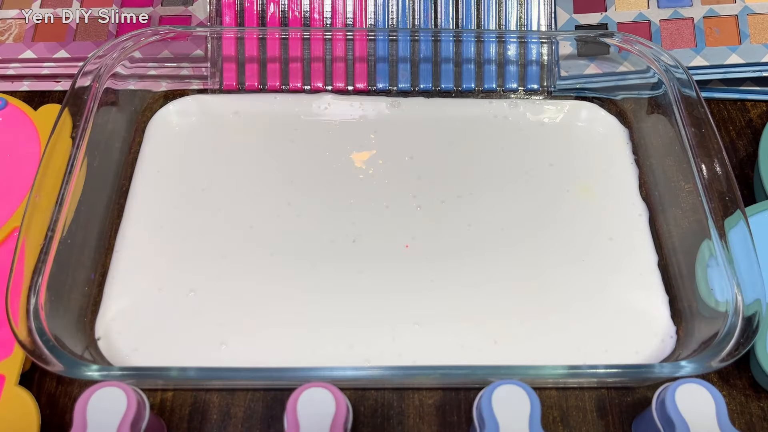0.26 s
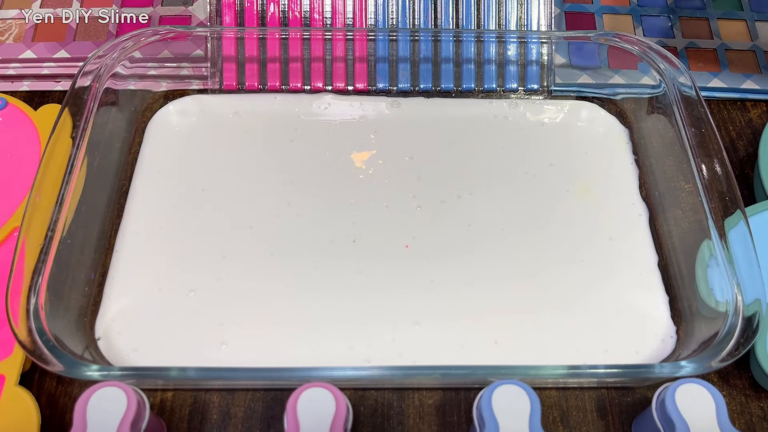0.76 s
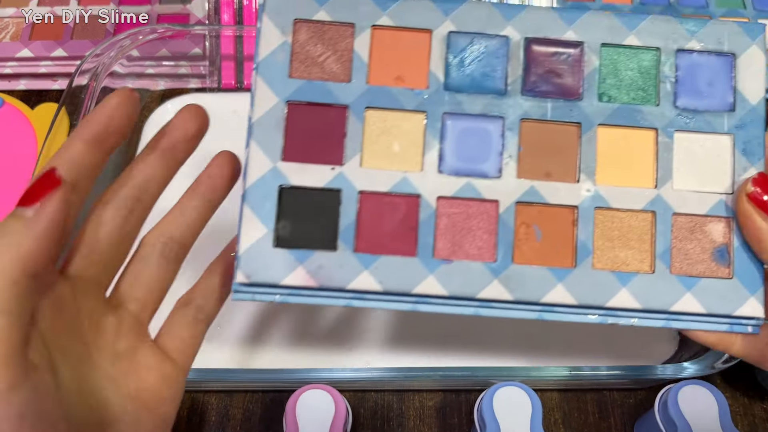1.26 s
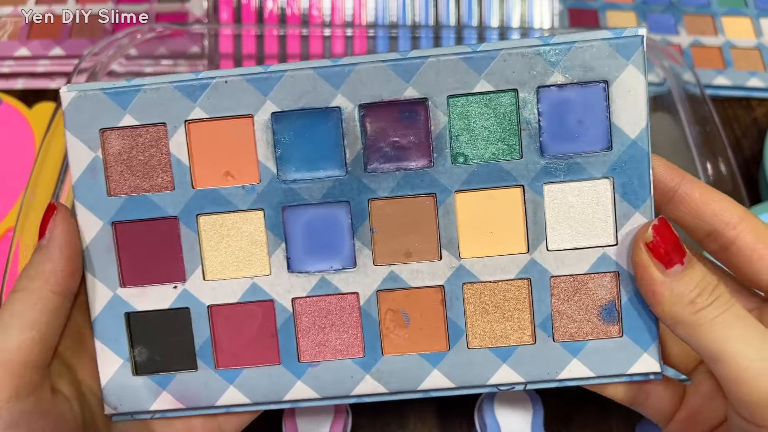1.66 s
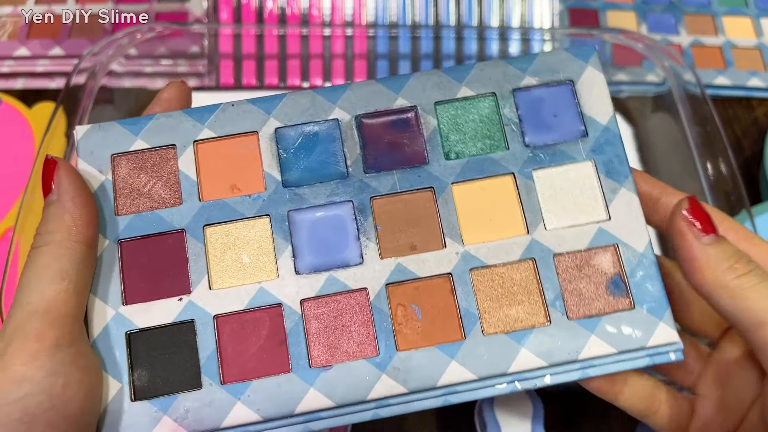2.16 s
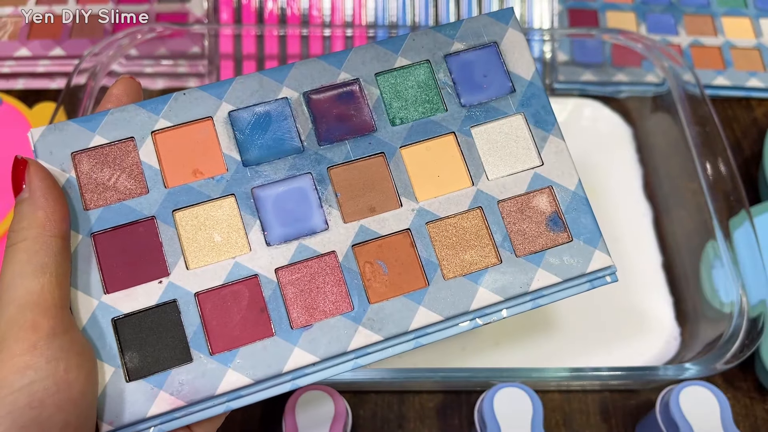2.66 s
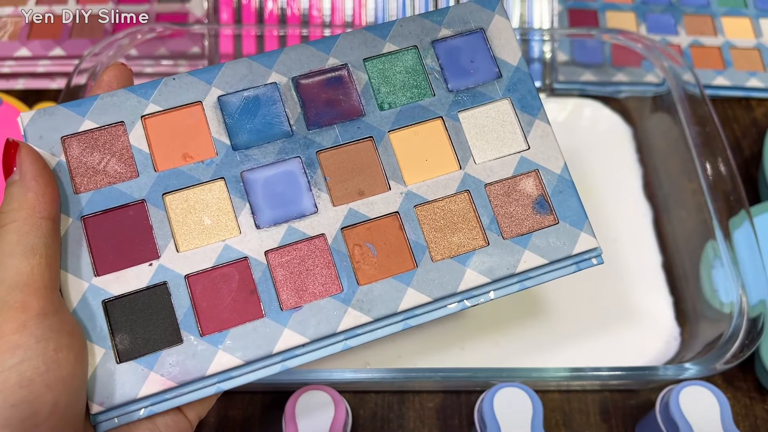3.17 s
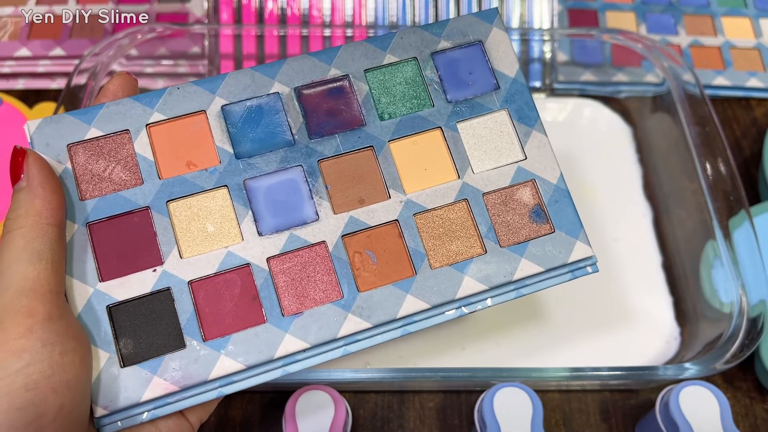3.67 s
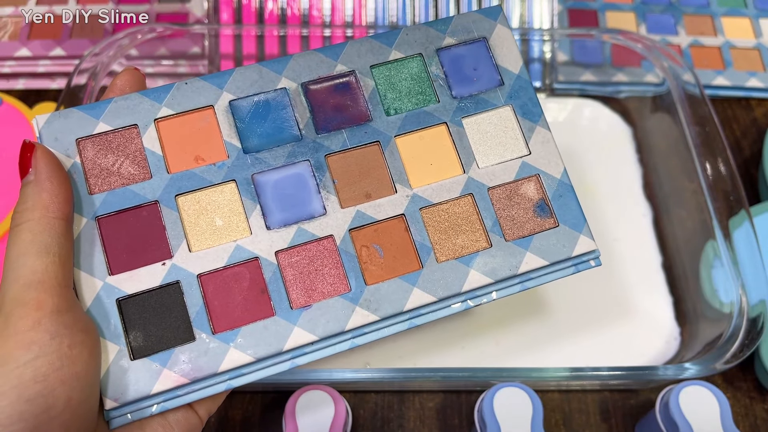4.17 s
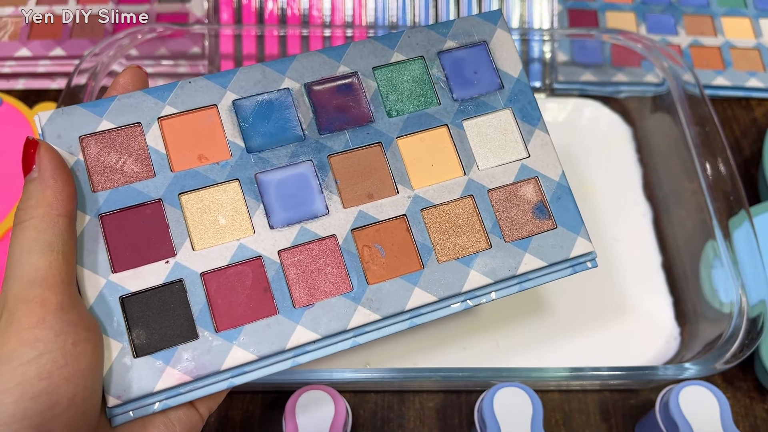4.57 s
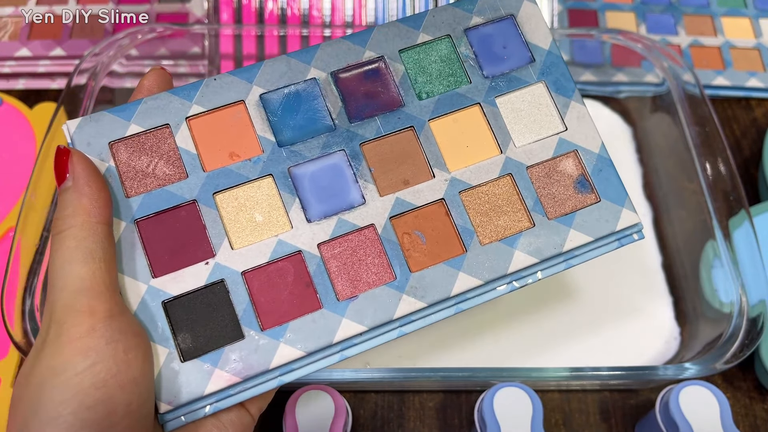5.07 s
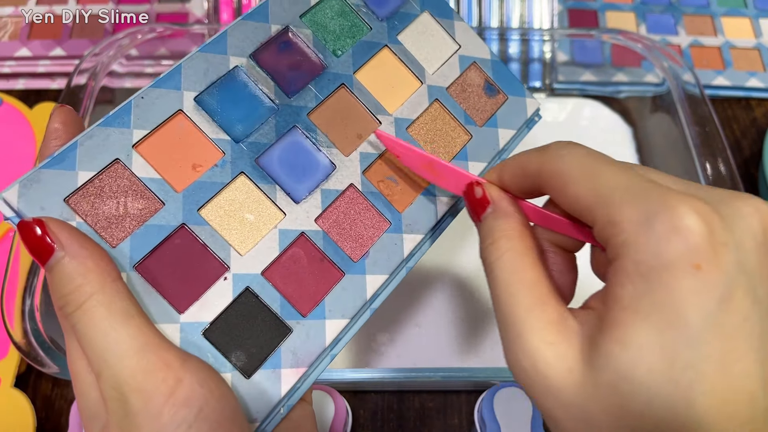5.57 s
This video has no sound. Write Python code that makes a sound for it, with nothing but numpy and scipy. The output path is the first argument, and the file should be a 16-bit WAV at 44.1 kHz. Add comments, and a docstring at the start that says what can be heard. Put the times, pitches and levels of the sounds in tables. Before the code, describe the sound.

A cardboard palette knocks sharply on a table, a quiet gap follows, then clacks, scuffing slides and small plastic tool clicks over faint hiss.

```python
"""A cardboard eyeshadow palette is knocked on a table and lifted over a glass dish: damped bending waves,
edge echoes, a thud and rebounds. Hard clicks are a tap on the dish, then plastic tools as a hand picks a
spatula; fingers slide and hard edges scrape as swells of uneven filtered noise; bumped things ring as
dying modes. A small dry room adds short reflections, hiss, a faint wavering hum and low hollow background
noise around 500 Hz that steps up twice. Two close microphone ports differ in delay and colour."""
import sys
import numpy as np
from scipy import signal
from scipy.fft import rfft, irfft
from scipy.io import wavfile
from scipy.ndimage import uniform_filter1d

SR = 44100
rng = np.random.default_rng(int(sys.argv[2]) if len(sys.argv) > 2 else 0)


def digitize_waveform(pressure):
    """Quantize a signal to 16-bit integers and store it at the path in sys.argv[1].

    Rows of a 2-D input are taken as channels; values are limited to [-1, 1].
    """
    field = np.atleast_2d(pressure).T
    bounded = np.clip(field, -1, 1)
    quanta = np.round(bounded * 32767).astype(np.int16)
    wavfile.write(sys.argv[1], SR, quanta)


N = 257103  # samples


def gain_of(db):
    """Decibels to amplitude."""
    return 10 ** (np.asarray(db) / 20)


def evened(x):
    """Scales to rms 1."""
    return x / np.sqrt(np.mean(x ** 2) + 1e-20)


def burst(x, db):
    """Scales a short sound to the energy of 10 ms at this level."""
    energy = np.sum(x ** 2, -1, keepdims=True) + 1e-20
    return gain_of(db) * x * np.sqrt(SR / 100 / energy)


def read(points, hz):
    """Interpolates a spectrum table linearly over log frequency."""
    f, value = np.transpose(points)
    return np.interp(np.log(hz + 1), np.log(f + 1), value)


def coloured(x, points):
    """Causal minimum-phase filter with the given spectrum."""
    size = 4096
    log_gain = np.log(gain_of(read(points, abs(np.fft.fftfreq(size, 1 / SR)))))
    min_phase = np.exp(np.conj(signal.hilbert(log_gain)))
    taps = np.fft.ifft(min_phase).real[:size // 2]
    return signal.fftconvolve(x, taps[None], axes=1)[:, :x.shape[1]]


def add(mix, start_s, sound):
    """Mixes a sound in at start_s."""
    part = mix[:, max(round(start_s * SR), 0):][:, :sound.shape[-1]]
    part += sound[..., :part.shape[1]]


def pair(size, same):
    """White noise at two ports that share a part of its power."""
    same = np.clip(same, 0, 1)
    common = np.sqrt(same) * rng.standard_normal(size)
    return common + np.sqrt(1 - same) * rng.standard_normal((2, size))


def ports(x, lag_samples):
    """Direction: the left port hears the sound lag_samples later."""
    i = np.arange(x.shape[1])
    left = np.interp(i - np.round(lag_samples), i, x[0], left=0)
    return np.array([left, x[1]])


def drift(rate_hz):
    """Smooth random wandering of rms 1, low-passed near rate_hz."""
    lowpass = np.exp(-(np.fft.rfftfreq(N, 1 / SR) / rate_hz) ** 2)
    return evened(irfft(rfft(rng.standard_normal(N)) * lowpass, N))


# even hiss: f/Hz, density/dB per Hz
HISS = [(40, 2.5), (1000, 1), (2000, -2.5), (5000, -7), (9600, -5), (11300, -3), (12600, -12.5)]
# ridge of hiss, left port only: f/Hz, density/dB per Hz
RIDGE = [(1000, -19), (5050, -25.5), (5450, -12), (6100, -0.5), (6800, -10.5), (7350, -24.5), (8100, -25.5),
         (8600, -15.5), (9300, -38.5)]


def hiss(hiss_db=-78.5, ridge_db=-67):
    """Steady filtered noise, with a narrow band near 6 kHz on the left."""
    out = gain_of(hiss_db) * evened(coloured(pair(N, 0.15), HISS))
    out[0] += gain_of(ridge_db) * evened(coloured(rng.standard_normal((1, N)), RIDGE))[0]
    return out


# steady low background noise: f/Hz, density/dB per Hz
LOW_NOISE = [(20, -17), (55, -5.5), (170, -14.5), (250, -7), (370, -8), (430, -12), (485, 0.5), (530, 1.5),
             (575, -3.5), (625, -0.5), (720, -10.5), (850, -16.5), (1100, -33), (2500, -50.5)]
# background noise added while raised: f/Hz, density/dB per Hz
RAISED_NOISE = [(60, -13), (250, -10), (430, -8.5), (490, 2.5), (560, 3.5), (630, -3.5), (730, -13.5),
                (900, -22.5), (2500, -53.5)]
# noise steps up, holds, sinks back: start t/s, end t/s
RAISED_SPANS = [(0, 0.61), (2.348, 3.626)]


def low_noise(steady_db=-67, raised_db=-56.5, attack_s=0.011, release_s=0.055, flutter_db=1.4):
    """Low hollow background noise around 500 Hz that steps up twice, holds and sinks back; it flutters."""
    t = np.arange(N) / SR
    envelope = sum(np.interp(t, [on, on + attack_s, off, off + release_s], [0, 1, 1, 0])
                   for on, off in RAISED_SPANS)
    steady = gain_of(steady_db) * evened(coloured(pair(N, 0.5), LOW_NOISE))
    raised = gain_of(raised_db) * envelope * evened(coloured(pair(N, 0.52), RAISED_NOISE))
    return ports((steady + raised) * gain_of(flutter_db * drift(22)), 5)


# hum before its random wander: t/s, level/dB
HUM_LEVEL = [(0.0, -68.5), (1.23, -82), (2.14, -75), (3.04, -65.5), (3.41, -76), (4.98, -81), (5.52, -76.5),
             (5.83, -82.5)]


def hum(centre_hz=116, waver_hz=4.5, wander_db=3.4):
    """One sine whose pitch and level wander."""
    tone = np.sin(2 * np.pi * np.cumsum(centre_hz + waver_hz * drift(12)) / SR)
    level_db = np.interp(np.arange(N) / SR, *np.transpose(HUM_LEVEL))
    return gain_of(level_db + wander_db * drift(5.98)) * evened(tone)


def room_tone():
    """Hiss, low noise and hum together."""
    return hiss() + low_noise() + hum()


# room decay: f/Hz, t60/s
ROOM = [(100, 0.36), (260, .2), (700, 0.13), (1800, 0.168), (4800, 0.18), (11000, 0.15)]


def room(x, gap_s=0.0027, build_s=0.0034):
    """Dense reflections of random sign, each band dying at its own speed."""
    hz, t, z = signal.stft(pair(SR // 2, 0.48), SR, nperseg=256)
    decay = gain_of(-60 * t / read(ROOM, hz)[:, None])
    tail = signal.istft(z * decay, SR, nperseg=256)[1]
    after_gap_s = np.maximum(np.arange(tail.shape[1]) / SR - gap_s, 0)
    tail = tail * (1 - np.exp(-after_gap_s / build_s))
    return signal.fftconvolve(x, tail / np.linalg.norm(tail[0]), axes=1)[:, :N]


def ring(modes, t):
    """Sum of exponentially dying sine modes of a struck thing."""
    return sum(gain_of(db - 60 * t / t60) * np.sin(2 * np.pi * hz * t) for hz, db, t60 in modes)


# modes of table top, glass dish, loose tools, plastic spatula: f/Hz, relative level/dB, t60/s
TABLE = [(102, -10.5, 0.15), (172, 1.5, 0.15), (215, -9, 0.057)]
DISH = [(1410, 5, 0.12), (1760, -30, 0.13), (2690, -20.5, 0.11), (3300, 0, 0.098), (4070, -7, 0.057)]
TOOLS = [(1065, 1, 0.068), (1486, -23.5, 0.11), (1750, -12, 0.12), (2254, 2, 0.12), (3100, -11, 0.1188)]
SPATULA = [(3370, 2, 0.016), (3650, -13, 0.04), (4860, -15.5, 0.02)]
# bumps that leave something ringing: t/s, modes, level/dB, build-up/s
BUMPS = [(0.371, TABLE, -36, 0.0058), (0.619, DISH, -53.5, .0005), (4.1758, SPATULA, -39, .0006),
         (4.461, SPATULA, -45, 0.0016), (4.473, SPATULA, -48, .001), (4.505, TABLE, -50, .01),
         (4.508, TOOLS, -45, 0.0012)]


def ringing():
    """Table, dish, spatula and loose tools ring on in their modes when bumped."""
    out, t = np.zeros((2, N)), np.arange(SR // 3) / SR
    for start_s, modes, db, build_s in BUMPS:
        add(out, start_s, burst(ring(modes, t) * (1 - np.exp(-t / build_s)), db))
    return out


def contact_spot(x, ring_s=0.0034, ring_db=-5):
    """Each rubbed spot has its own crowd of short resonances."""
    t = np.arange(SR // 50) / SR
    taps = rng.standard_normal(len(t)) * np.exp(-t / ring_s)
    taps = (t == 0) + gain_of(ring_db) * taps / np.linalg.norm(taps)
    return signal.fftconvolve(x, taps[None] / np.linalg.norm(taps), axes=1)[:, :x.shape[1]]


# cardboard rasp and skin swish: f/Hz, density/dB per Hz
RASP = [(60, -19.5), (200, 0), (650, -8.5), (1050, -5), (1600, -7.5), (2300, -6), (4000, -39)]
SWISH = [(2500, -29), (5000, -13), (7000, -9.5), (9300, 2), (10300, -4.5), (11300, 2), (12000, -14),
         (13000, -14.5)]
SCRAPE_HZ = 3450  # pitch at which the scrape tables are written


def stroke(peak_s, length_s, rasp_db, scrape_db, scrape_colour, scrape_hz, swish_db,
           grain_db=4.0, grain_s=0.0009, rise_share=0.53, lag_samples=11):
    """Sliding contact: a pressure swell of tiny uneven slips, from dull rasp to swish."""
    t = np.arange(-SR // 5, SR // 5) / SR
    width_s = length_s * np.where(t < 0, rise_share, 1 - rise_share)
    pressure = np.exp(-0.5 * (t / width_s) ** 2)
    grain = uniform_filter1d(rng.standard_normal(len(t)), max(round(grain_s * SR), 1))
    slips = gain_of(grain_db * evened(grain))
    edge = np.array(scrape_colour) * [scrape_hz / SCRAPE_HZ, 1]  # a stiffer edge scrapes higher
    layers = (RASP, rasp_db), (edge, scrape_db), (SWISH, swish_db)
    friction = sum(gain_of(db) * evened(coloured(pair(len(t), 0.3) * slips, colour))
                   for colour, db in layers)
    return peak_s + t[0], ports(contact_spot(friction) * pressure, lag_samples)


# soft and hard-edge scrape, the latter with a narrower peak: f/Hz, density/dB per Hz
SCRAPE = [(1000, -29.5), (1700, -10), (2300, -4.5), (2850, -5.5), (3450, -4.5), (3950, -7.5), (5200, -9.5),
          (7000, -11), (11000, -26.5)]
EDGE_SCRAPE = [(1000, -17), (1700, -12.5), (2900, -6), (3250, -0.5), (3450, 3.5), (3680, -9), (4300, -9.5),
               (7000, -17.5), (11000, -33)]
# scuff under a knock: knock level/dB, scuff level/dB
SCUFF_LEVEL = [(-50, -49), (-21, -43.5)]
# finger and cardboard slides: peak t/s, length/s, base level/dB, brightness/dB (- rasp, + swish)
SLIDES = [(0.086, 0.038, -87, 9), (0.291, 0.045, -79.5, 8), (.315, 0.016, -56, -0.5),
          (0.584, 0.018, -75.5, -19), (.616, .023, -59.5, -13.5), (1.46, 0.024, -72, 0.5),
          (2.001, 0.055, -70.5, 20.5), (2.142, 0.018, -73, 2), (2.753, 0.03, -55, -4.5),
          (3.054, 0.036, -55, -1.5), (3.112, 0.054, -68.5, -7.5), (3.21, 0.019, -46.5, -4.5),
          (3.368, 0.028, -51, -4.5), (3.414, 0.015, -52, -2.5), (3.455, 0.036, -46.5, -0.5),
          (3.523, 0.05, -66, 0), (4.032, 0.074, -69, 6), (4.195, 0.039, -60.5, -1),
          (4.494, 0.016, -40.5, -3.5), (4.513, 0.019, -42.5, -2.5), (5.21, .03, -78.5, 4.5)]
# hard edges: peak t/s, length/s, base level/dB, f/Hz
SCRAPES = [(1.525, 0.011, -60.5, 3250), (3.321, 0.051, -55, 4050), (4.106, 0.066, -64, 3700),
           (4.274, 0.053, -70.5, 4700), (4.467, .025, -52.5, 4630)]
# layers, dB re the scuff, slide or scrape level
SCUFF_RASP_DB, SCUFF_SCRAPE_DB, SCUFF_SWISH_DB = -2, -9, -26.5
SLIDE_RASP_DB, SLIDE_SCRAPE_DB, SLIDE_SWISH_DB = -2, 1.5, -1
EDGE_RASP_DB, EDGE_SCRAPE_DB, EDGE_SWISH_DB = -5, 3.5, -8.5
SCUFF_S, SCUFF_LEAD_S, SLIDE_HZ = 0.015, 0.004, 3530


def rubbing():
    """Friction strokes: a scuff around each knock, soft slides, scrapes of hard edges."""
    out = np.zeros((2, N))
    for start_s, knock_db, *_, gap_s in KNOCKS:
        db = np.interp(knock_db, *np.transpose(SCUFF_LEVEL))
        add(out, *stroke(start_s + gap_s - SCUFF_LEAD_S, SCUFF_S, db + SCUFF_RASP_DB,
                         db + SCUFF_SCRAPE_DB, SCRAPE, SLIDE_HZ, db + SCUFF_SWISH_DB))
    for peak_s, length_s, db, bright_db in SLIDES:
        add(out, *stroke(peak_s, length_s, db - bright_db + SLIDE_RASP_DB,
                         db + SLIDE_SCRAPE_DB, SCRAPE, SLIDE_HZ, db + bright_db + SLIDE_SWISH_DB))
    for peak_s, length_s, db, hz in SCRAPES:
        add(out, *stroke(peak_s, length_s, db + EDGE_RASP_DB,
                         db + EDGE_SCRAPE_DB, EDGE_SCRAPE, hz, db + EDGE_SWISH_DB))
    return out


def knock(t, nominal_hz, echo_db, settle_s=0.0016, echo_s=0.0099):
    """A heavily damped bending wave whose high part arrives first, then its edge echoes."""
    # glides from 1.43 to 0.43 of nominal_hz
    turns = np.cumsum(nominal_hz * (0.43 + np.exp(-t / settle_s))) / SR
    age = t / 0.0007
    wave = burst(age ** 1.5 * np.exp(-age) * np.sin(2 * np.pi * turns), 0)
    edges = pair(len(t), 0.24) * np.exp(-t / echo_s) * (1 - np.exp(-t / 0.0021))
    echoes = signal.fftconvolve(edges, wave[None], axes=1)[:, :len(t)]
    return wave + burst(echoes, echo_db)


# contact tick and hard-shell clack: f/Hz, density/dB per Hz
TICK = [(1500, -30.5), (3000, -10.5), (4600, 0), (5600, -1), (6600, -0.5), (9000, 3), (10200, -8),
        (11300, 0), (12400, -9), (14000, -16)]
CLACK = [(900, -25.5), (1800, 7), (2500, -5), (3600, -1.5), (4200, -4.5), (5200, -11.5), (7000, -16),
         (11000, -28.5)]
# low modes of palette and table top, rescaled at random per blow: f/Hz, relative level/dB, t60/s
PALETTE = [(155, -10, 0.14), (275.2, -8, 0.13), (379, 4, 0.042), (570, 2.5, 0.035)]


def blow(thud_db, knock_db, nominal_hz, echo_db, clack_db, tick_db, lag_samples, clack_s=0.0023):
    """One blow: contact tick, clack of the hard shell, damped knock and modal thud."""
    t = np.arange(SR // 5) / SR
    bite = 1 - np.exp(-t / 0.0005)
    tick = coloured(pair(len(t), 0.78) * bite * np.exp(-t / 0.0008), TICK)
    clack = coloured(pair(len(t), 0.67) * bite * np.exp(-t / clack_s), CLACK)
    mode_t = t * (1 + 0.062 * rng.standard_normal())
    thud = ring(PALETTE, mode_t) * (1 - np.exp(-t / 0.0021))
    sound = burst(tick, tick_db) + burst(clack, clack_db) + burst(thud, thud_db)
    return ports(sound + burst(knock(t, nominal_hz, echo_db), knock_db), lag_samples)


# hard clicks, the first on the dish:
# t/s, strength level/dB, sharpness/dB, nominal f/Hz, echo level/dB re direct wave
CLICKS = [(0.6217, -56.5, -5, 1210, -11), (2.7423, -41.5, 0.5, 1940, -12), (3.6004, -69, -6.5, 1930, 5),
          (3.8098, -59.5, -9, 1050, -5.5), (3.8704, -49, 5, 2000, -10.5), (4.072, -66, 10, 1900, -8),
          (4.138, -61.5, 19.5, 1920, -3), (4.1747, -47, 4, 1260, 0), (4.2028, -53.5, 2.5, 1880, -6),
          (4.2977, -52, -4.5, 1310, 8), (4.489, -46, -3.5, 1090, -8), (4.4998, -57.5, 13.5, 1200, -2),
          (4.5091, -59, 6, 1770, -3)]
CLICK_THUD_DB, CLICK_KNOCK_DB, CLICK_CLACK_DB = -11.5, -1, 1
CLACK_LOSS_SHARE, CLICK_LAG_SAMPLES = 0.58, 12


def hard_clicks():
    """A tap on the glass dish, then plastic tools, all off to the right; sharp ones are mostly tick."""
    out = np.zeros((2, N))
    for start_s, db, sharp_db, hz, echo_db in CLICKS:
        body_db = db - sharp_db
        clack_db = db + CLICK_CLACK_DB - CLACK_LOSS_SHARE * sharp_db
        add(out, start_s, blow(body_db + CLICK_THUD_DB, body_db + CLICK_KNOCK_DB, hz, echo_db,
                               clack_db, db + sharp_db, CLICK_LAG_SAMPLES))
    return out


# palette knocks: t/s, strength level/dB, nominal f/Hz, flatness (0 corner - 1 face),
# rebounds (count), gap to first rebound/s
KNOCKS = [(0.366, -22.5, 1099, .03, 0, 0), (2.7805, -28, 1755, 0.36, 2, 0.014),
          (3.2001, -36, 894, 0.8, 1, 0.0088), (3.3583, -45.5, 1110, 0.88, 1, .0147)]
# thud re strength; echoes re direct wave; rebound re the contact before it
CORNER_THUD_DB, CORNER_ECHO_DB, CORNER_REBOUND_DB = -17, -12.5, -9
FLAT_THUD_DB, FLAT_ECHO_DB, FLAT_REBOUND_DB = 1.5, 7.5, -4
REBOUND_PITCH, REBOUND_GAP = 0.772, 0.78  # ratio per rebound
# re strength; clack and tick at 1 kHz nominal: a harder contact is higher and brighter
KNOCK_DB, KNOCK_CLACK_DB, KNOCK_TICK_DB, BRIGHT_DB_PER_OCTAVE = -1, -14.5, -26, 11.5
PALETTE_LAG_SAMPLES = -1


def palette_knocks():
    """The palette lands clean on a corner or thudding on its face; rebounds weaken, drop and hasten."""
    out = np.zeros((2, N))
    for start_s, db, hz, flat, rebounds, gap_s in KNOCKS:
        thud_db = CORNER_THUD_DB + flat * (FLAT_THUD_DB - CORNER_THUD_DB)
        echo_db = CORNER_ECHO_DB + flat * (FLAT_ECHO_DB - CORNER_ECHO_DB)
        rebound_db = CORNER_REBOUND_DB + flat * (FLAT_REBOUND_DB - CORNER_REBOUND_DB)
        for _ in range(1 + round(rebounds)):
            treble_db = db + BRIGHT_DB_PER_OCTAVE * np.log2(hz / 1000)
            add(out, start_s, blow(db + thud_db, db + KNOCK_DB, hz, echo_db, treble_db + KNOCK_CLACK_DB,
                                   treble_db + KNOCK_TICK_DB, PALETTE_LAG_SAMPLES))
            start_s += gap_s
            db += rebound_db
            hz *= REBOUND_PITCH
            gap_s *= REBOUND_GAP
    return out


# port colour of handling, left hollow near 1 kHz: f/Hz, left-right level/dB
PORT_COLOUR = [(500, 1), (800, -5.5), (1200, -5), (1800, 1), (4000, 3), (9000, 0.5)]


def scene():
    """Handling and its reflections, coloured by each port, over the room tone."""
    struck = palette_knocks() + hard_clicks() + ringing()
    rubbed = rubbing()
    reflections = room(gain_of(-9) * struck + gain_of(-8.5) * rubbed)
    handling = struck + rubbed + reflections
    lean_db = read(PORT_COLOUR, np.fft.rfftfreq(N, 1 / SR)) / 2
    return irfft(rfft(handling) * gain_of([lean_db, -lean_db]), N) + room_tone()


def record(dry, band_limit_hz=12700):
    """The recorder's band limit: a linear-phase low-pass."""
    lowpass = signal.firwin(255, band_limit_hz, window=("kaiser", 9), fs=SR)
    return signal.oaconvolve(dry, lowpass[None], "same")


dry = scene()
out = record(dry)
digitize_waveform(out)
```